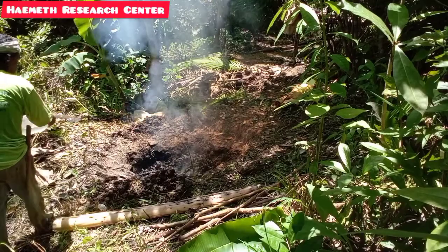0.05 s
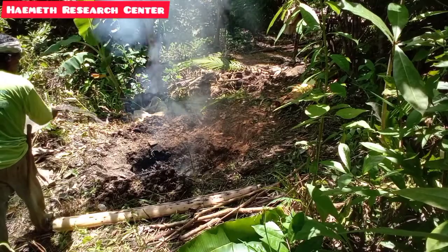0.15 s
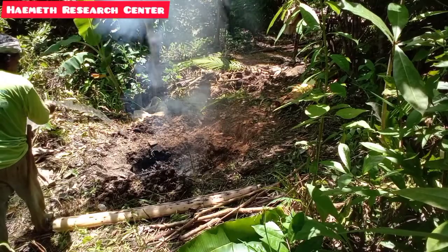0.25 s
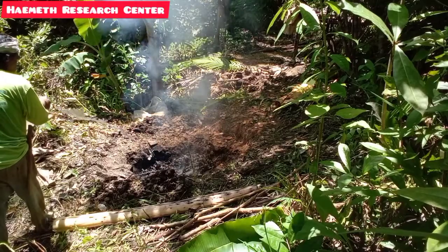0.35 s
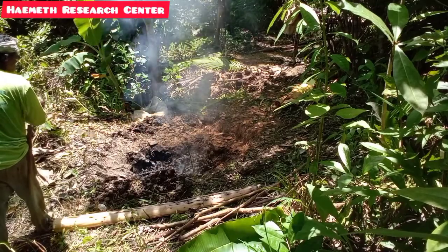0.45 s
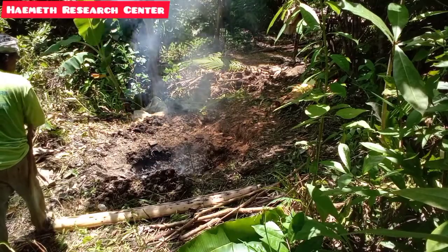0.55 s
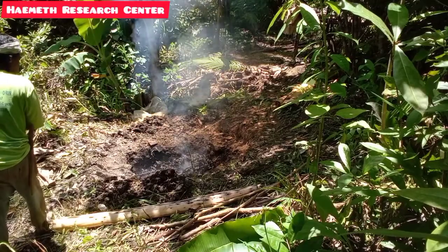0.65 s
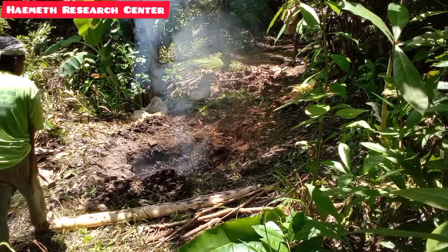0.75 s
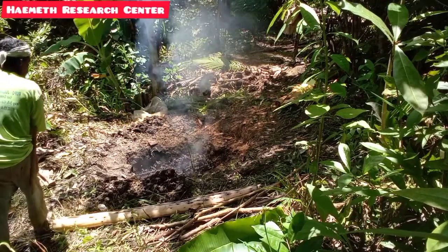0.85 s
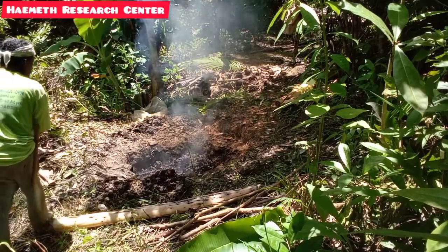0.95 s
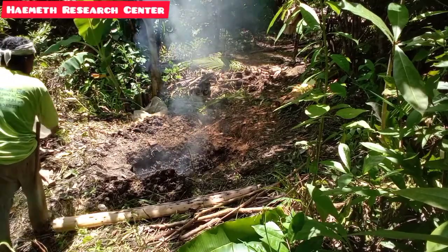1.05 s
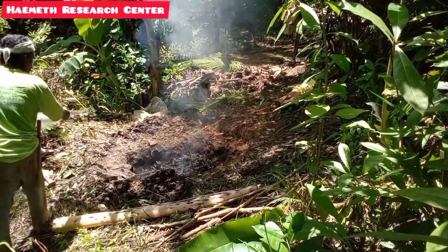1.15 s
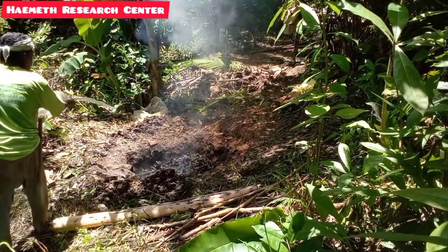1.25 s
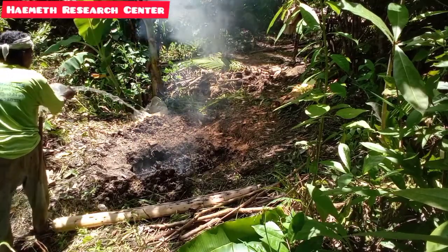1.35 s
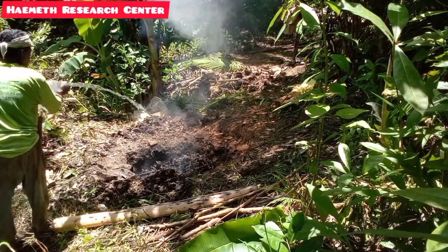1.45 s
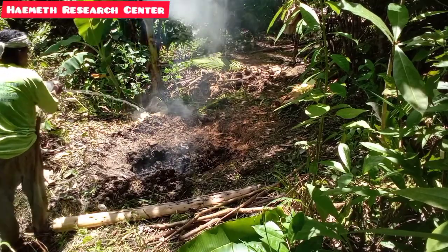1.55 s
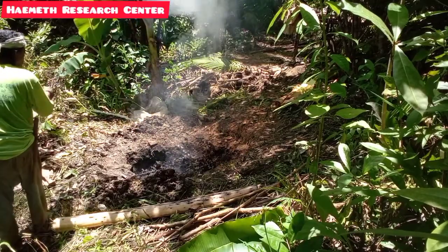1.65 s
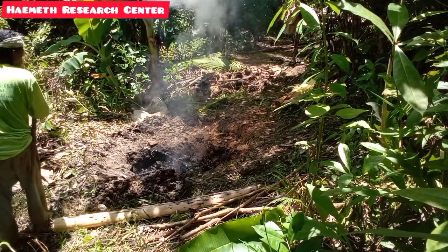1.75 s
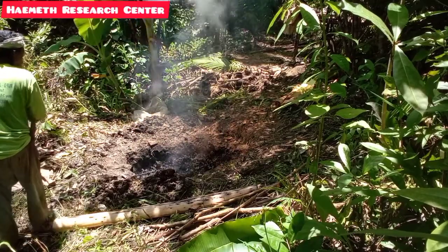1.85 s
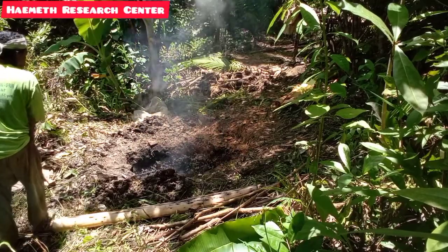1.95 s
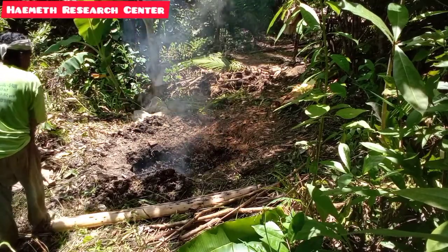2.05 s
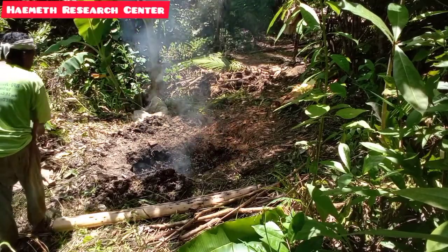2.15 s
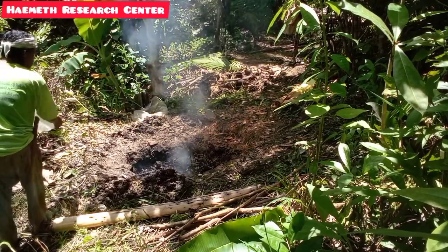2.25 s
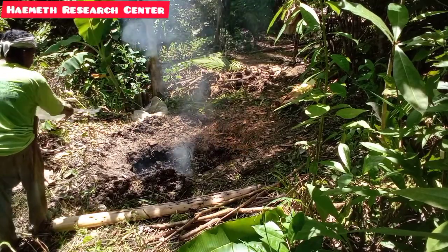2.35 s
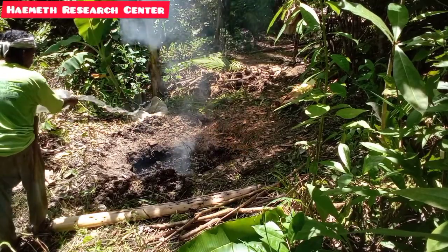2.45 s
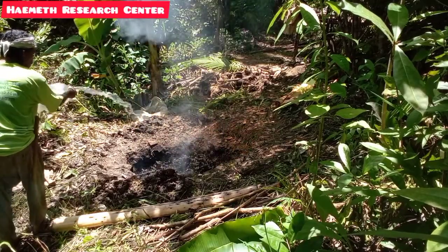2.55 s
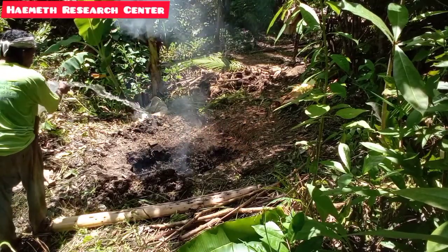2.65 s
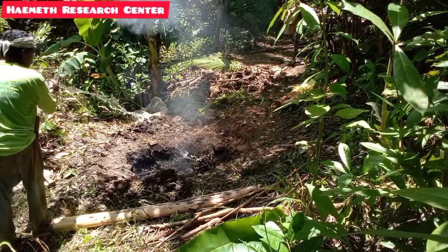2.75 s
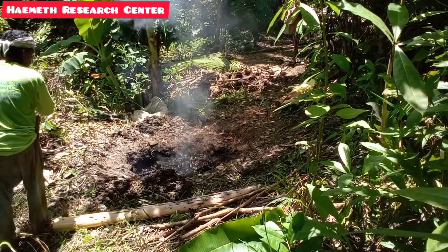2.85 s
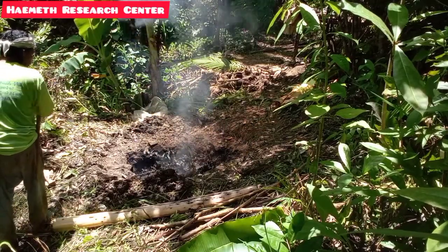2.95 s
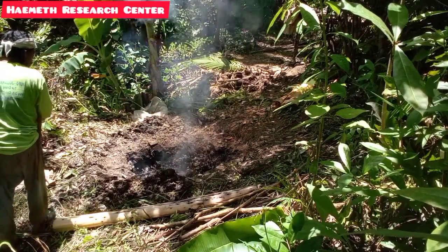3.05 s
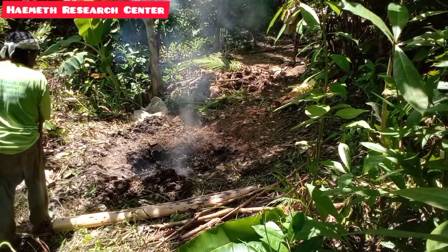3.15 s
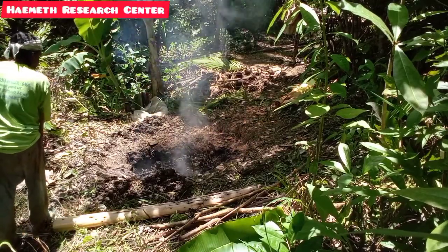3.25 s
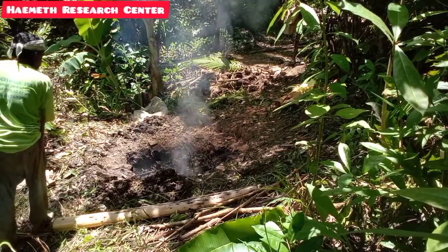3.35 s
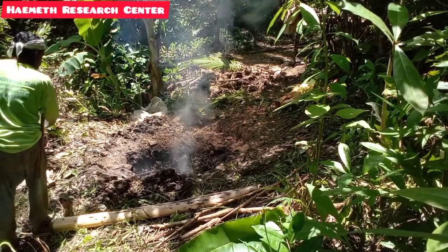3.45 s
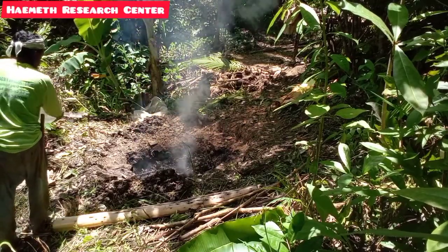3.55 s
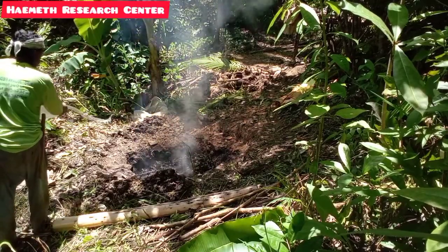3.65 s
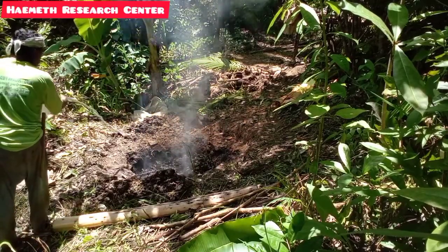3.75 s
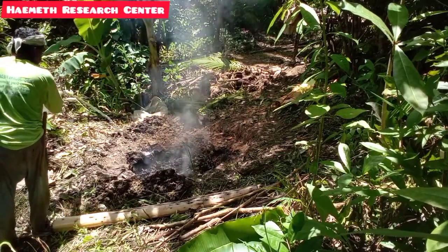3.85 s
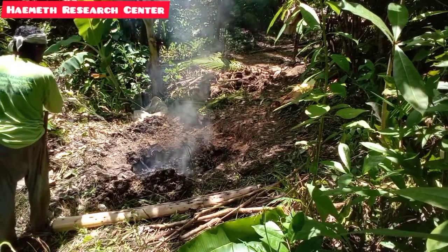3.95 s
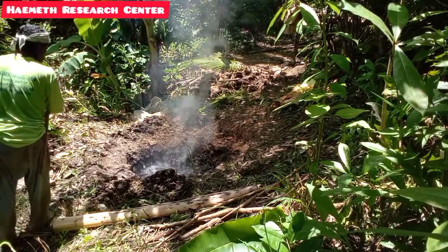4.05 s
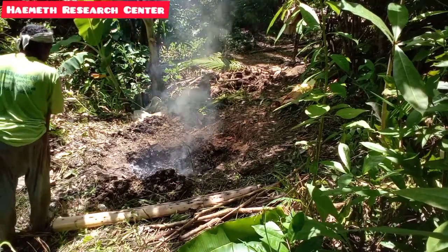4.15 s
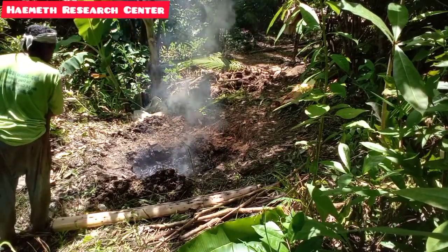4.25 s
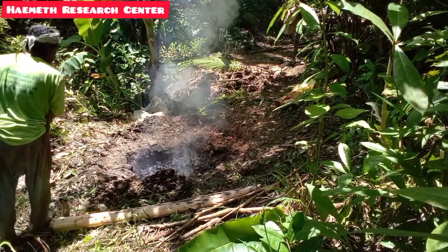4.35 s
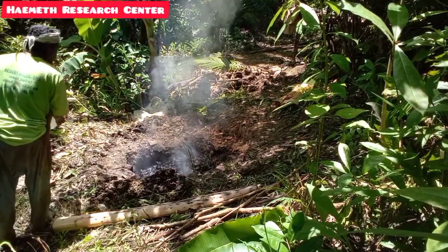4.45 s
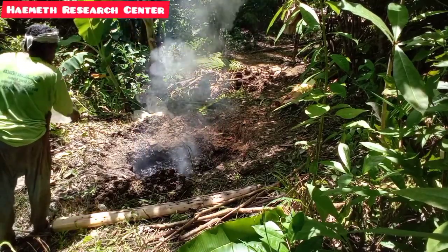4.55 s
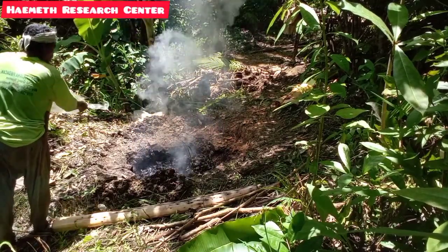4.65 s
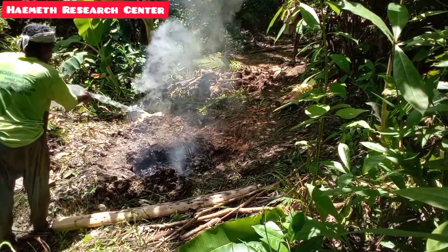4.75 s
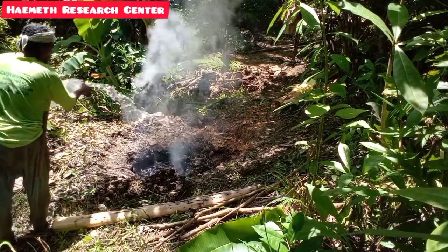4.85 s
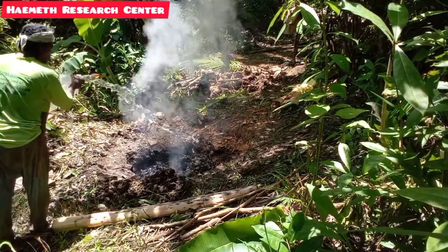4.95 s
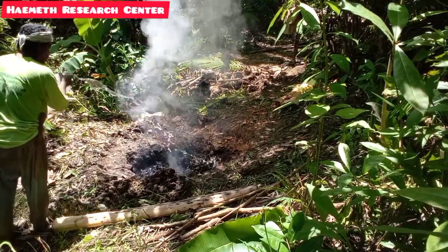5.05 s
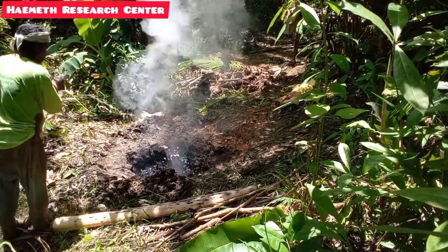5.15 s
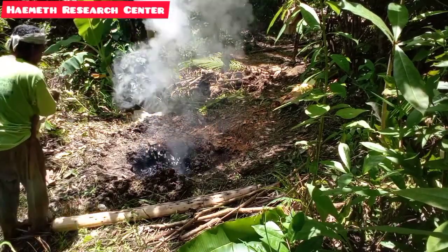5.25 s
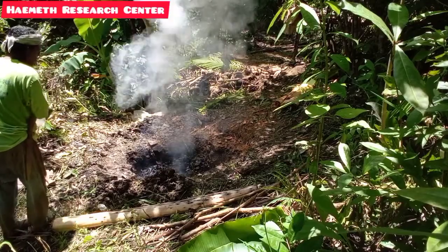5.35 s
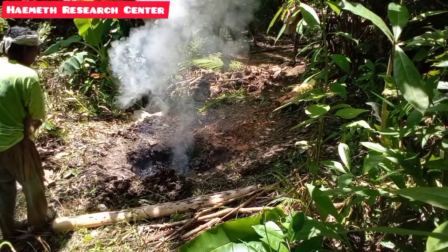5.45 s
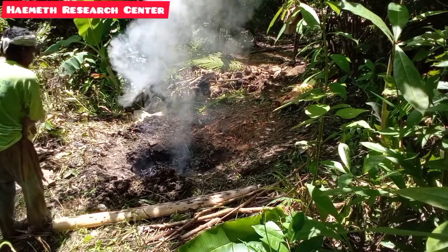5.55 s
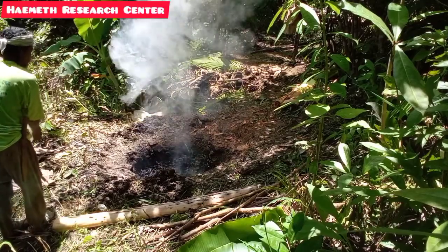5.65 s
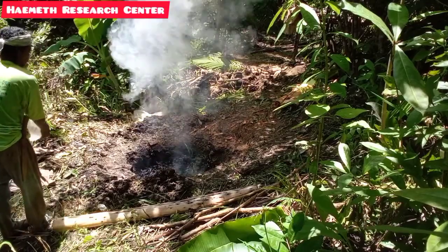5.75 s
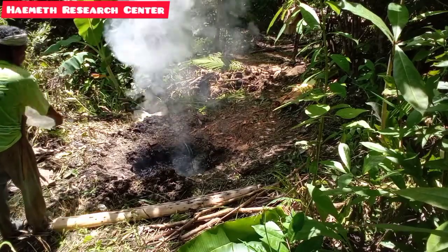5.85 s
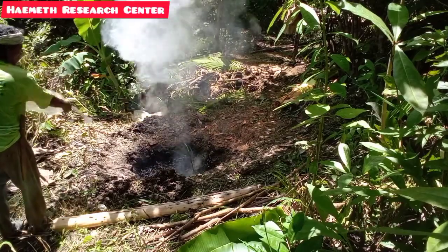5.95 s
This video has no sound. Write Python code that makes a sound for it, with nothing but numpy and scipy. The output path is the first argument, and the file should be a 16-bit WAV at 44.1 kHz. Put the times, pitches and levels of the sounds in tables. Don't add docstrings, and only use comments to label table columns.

```python
import sys
import numpy as np
from scipy import signal
from scipy.fft import rfft, irfft
from scipy.io import wavfile

SR = 44100
rng = np.random.default_rng(int(sys.argv[2]) if len(sys.argv) > 2 else 0)


def invert_db(x):
    u = np.asarray(x, float) / 20
    return 10 ** u


def generate_wav(sig):
    pcm = np.round(np.clip(np.atleast_2d(sig).T, -1, 1) * 32767).astype(np.int16)
    wavfile.write(sys.argv[1], SR, pcm)


N = 264600
LEAD = 1200


def rms_one(x):
    return x / np.sqrt(np.mean(x ** 2) + 1e-20)


def in_time(rows):
    s, *columns = np.transpose(rows)
    return [np.interp(np.arange(N) / SR, s, c) for c in columns]


def coloured(x, spectrum):
    hz, level_db = np.transpose(spectrum)
    grid_hz = np.fft.rfftfreq(N, 1 / SR) + 1
    gain_db = np.interp(np.log(grid_hz), np.log(hz), level_db, left=-80)
    return irfft(rfft(x) * invert_db(gain_db), N)


def band(x, low_hz, high_hz, order=2):
    return signal.sosfilt(signal.butter(order, [low_hz, high_hz], "band", fs=SR, output="sos"), x)


def drift(rate):
    r = np.exp(-80 * np.pi * rate / SR)
    coarse = rng.standard_normal(N // 40 + 2002)
    slow = signal.lfilter([1], [1, -2 * r, r * r], coarse)[2000:]
    return np.interp(np.arange(N) / 40, np.arange(len(slow)), rms_one(slow))


def grains(per_s, spread_db):
    sizes = invert_db(spread_db * np.minimum(rng.exponential(1, N), 5)) * rng.choice([-1, 1], N)
    return rms_one(sizes * (rng.random(N) < per_s / SR))


def swell(bed_db, *heaps, hold=1):
    ms = np.arange(N * 1000 // SR + 2)
    power = 1e-12
    for s, peak_db, rise_ms, fall_ms in heaps:
        late = ms[:, None] - 1000 * s
        loss = np.where(late < 0, -late / rise_ms, np.abs(late / fall_ms) ** hold)
        power = power + (invert_db(peak_db - 10 * loss) ** 2).sum(axis=1)
    return 10 * np.log10(invert_db(bed_db) ** 2 + np.interp(np.arange(N) * 1000 / SR, ms, power))


def tone(hz):
    return lambda s: np.cos(2 * np.pi * hz * s)


def burst(swell_ms, fade_ms, wave):
    s = np.arange(-LEAD, 3 * LEAD) / SR
    early = (s * 1000 / max(swell_ms, .1)) ** 4
    late = np.abs(s * 1000 / max(fade_ms, .3)) ** 2.5
    return invert_db(-8 * np.where(s < 0, early, late)) * wave(s)


def add(out, s, x, lead=0):
    at = round(s * SR) - lead
    out[at:at + len(x)] += x[:N - at]


def air_pockets(rows):
    out, wet = np.zeros(N), rms_one(band(rng.standard_normal(N), 780, 1260))
    for s, peak_db, hz, swell_ms, fade_ms, splash_db in rows:
        add(out, s, invert_db(peak_db - 2.54) * burst(swell_ms, fade_ms, tone(hz)), LEAD)
        splash = burst(0.87 * swell_ms, 3.2 * fade_ms,
                       lambda t: wet[np.round((s + t) * SR).astype(int) % N])
        add(out, s - 0.449 * swell_ms / 1000, invert_db(peak_db + splash_db - 9.0) * splash, LEAD)
    return out


def steam_pockets(rows):
    return air_pockets([(s, db, hz, half_ms, half_ms, -14) for s, db, hz, half_ms in rows])


def snaps(rows):
    out, noise = np.zeros(N), rng.standard_normal((len(rows), 4 * LEAD))
    wander = .07 * np.cumsum(noise[:, ::-1], axis=1)
    wander = wander - wander[:, LEAD:LEAD + 1]
    for (s, peak_db, hz, fade_ms), rough, turn in zip(rows, noise, wander):
        ring = burst(0.27, fade_ms, lambda t: np.cos(2 * np.pi * hz * t + turn) + 0.26 * rough)
        add(out, s, invert_db(peak_db) * ring, LEAD)
        add(out, s, invert_db(peak_db - 14.0) * burst(0.076, 0.17, tone(1.3 * hz)), LEAD)
    return band(out, 250, 5000, order=1)


def bubbles(per_s, ring_ms, spread_db):
    luck, out = rng.random((round(per_s * N / SR), 3)), np.zeros(N + 1000)
    s = np.arange(700) / SR
    hz = 500 + 11000 * luck[:, 1:2] ** 2
    sizes = invert_db(-spread_db * np.log(luck[:, 2:] + .01)) * (hz / 1000) ** .25
    fade = invert_db(-40 * s * 1000 / ring_ms) * (1 - np.exp(-s * 1500))
    rings = sizes * np.sin(2 * np.pi * hz * s) * fade
    np.add.at(out, (luck[:, :1] * N).astype(int) + np.arange(len(s)), rings)
    return rms_one(out[:N])


# time_s, simmer_db, draught_db
PIT_STATE = [(0, -38.5, -51.5), (.25, -46.5, -52), (.47, -48.5, -47), (.8, -45.5, -52), (1.1, -48, -55.5),
             (1.25, -43.5, -48), (1.66, -46, -43.5), (2.05, -43.5, -44), (2.3, -44.5, -50.5),
             (2.75, -48.5, -47), (3.25, -42.5, -52), (3.5, -47, -49.5), (3.94, -47, -50),
             (4.26, -42.5, -52), (4.9, -43, -53.5), (5.45, -43.5, -46.5), (5.7, -49.5, -56.5),
             (6, -49.5, -56.5)]
# crest_s, fall_ms (per 10 dB), boiling_db, deep_surge_db, hollow_pit_db
GUSHES = [(0.407, 17, -62, -31, -61), (.518, 84, -40, -33, -37.5), (0.624, 84, -38.5, -37, -37),
          (.675, 81, -39, -48, -36), (1.688, 100, -35.5, -27.5, -28), (1.73, 60, -36.5, -31, -27),
          (1.778, 68, -32, -41, -29), (1.829, 86, -35.5, -28, -35.5), (1.9, 60, -38, -33, -42),
          (1.932, 71, -32.5, -23, -44), (1.988, 15, -33.5, -32, -23.5), (2.854, 40, -31, -25, -24.5),
          (2.871, 60, -22.5, -21.5, -28), (2.904, 24, -26, -30, -23), (3.002, 84, -34.5, -27.5, -39),
          (3.119, 73, -30.5, -28.5, -29), (3.075, 106, -39, -34, -33.5), (3.982, 192, -39.5, -36, -30),
          (4.2, 257, -44.5, -41, -42), (5.098, 80, -55, -38, -37), (5.179, 54, -31, -27.5, -31.5),
          (5.271, 39, -37.5, -34, -36), (5.35, 80, -51, -35.5, -36.5), (5.43, 88, -64, -30.5, -37.5)]
SPRAY_DB, SPRAY_FOLLOWS = -51, 0.7
SPRAY_GUSH_DB, SPRAY_GUSH_FOLLOWS, SPRAY_FALL_SHARE = -45, 0.59, 2.66
MIST_DB, MIST_FALL_MS = -10, 510
SPLATTER_DB, SPLATTER_DRAUGHT, SPLATTER_GUSH_DB = -4.5, 0.63, -3
GUSH_RISE_MS, WEAK_GUSH_SLOWER = 6, .7
BOIL_HOLD = 1.01
SLOSH_RISE_MS, SLOSH_FALL_MS = 2, 79
SLOSH_SPLATTER_DB, SLOSH_HOLLOW_DB = -15.5, -20


def boiling():
    simmer_db, draught_db = in_time(PIT_STATE)
    s, fall_ms, boil_db = np.transpose(GUSHES)[:3]
    dip_s, slap_db = np.transpose(DIPS)[:2]
    rise_ms = GUSH_RISE_MS * invert_db(-WEAK_GUSH_SLOWER * np.minimum(boil_db + 32, 0))
    over_db, wind_db = simmer_db + 46, draught_db + 50
    fine_db = SPRAY_GUSH_DB + SPRAY_GUSH_FOLLOWS * (boil_db + 36.5)
    spray = swell(SPRAY_DB + SPRAY_FOLLOWS * over_db,
                  (s, fine_db, rise_ms, SPRAY_FALL_SHARE * fall_ms),
                  (s, fine_db + MIST_DB, rise_ms, MIST_FALL_MS))
    splatter = swell(simmer_db + SPLATTER_DB + SPLATTER_DRAUGHT * (wind_db - over_db),
                     (s, boil_db + SPLATTER_GUSH_DB, rise_ms, fall_ms),
                     (dip_s, slap_db + SLOSH_SPLATTER_DB, SLOSH_RISE_MS, SLOSH_FALL_MS), hold=BOIL_HOLD)
    boil = swell(simmer_db, (s, boil_db, rise_ms, fall_ms), hold=BOIL_HOLD)
    return splatter, boil, spray


# frequency_hz, level_db (per Hz)
FIZZ = [(600, -6.5), (1050, -4.5), (1450, -1.5), (1950, -4), (2450, 3), (3300, 0.5), (4200, -2),
        (5000, -11.5), (6300, -17.5), (7500, -12.5), (8300, -5.5), (9300, -13.5), (11500, -21),
        (15700, -16)]


def sizzle():
    splatter_db, boil_db, spray_db = boiling()
    pops = [coloured(grains(15000, 1.3) + .42 * bubbles(900, 22.0, 1.4), FIZZ) for _ in range(2)]
    together, out = drift(21), np.zeros(N)
    groups = [(splatter_db, 640, 1900), (boil_db, 1900, 5000), (spray_db, 5000, 16000)]
    for group_db, low_hz, high_hz in groups:
        edges = np.geomspace(low_hz, high_hz, 5)
        part = np.zeros(N)
        for k in range(4):
            flicker = invert_db(.45 * together + .6 * drift(5.4))
            part += flicker * band(pops[k % 2], edges[k], edges[k + 1])
        out += invert_db(group_db - 1.04) * rms_one(part)
    return out


# frequency_hz, level_db (per Hz)
PIT = [(15, -55), (25, -45), (42, -26), (63, -1), (85, 5), (125, -1.5), (178, -7), (259, -6.5), (419, -7),
       (574, -9), (719, -17), (900, -64), (1170, -59), (1980, -120)]
DEEP_DB, DEEP_FOLLOWS, DEEP_LUMPS_DB = -61, 0.73, 2
SURGE_RISE_MS, SURGE_FALL_SHARE = 12, 1.02
SURGE_LAG_MS, SURGE_HOLD = 4.6, 1.37


def surge():
    draught_db = in_time(PIT_STATE)[1]
    s, fall_ms, _, push_db, boom_db = np.transpose(GUSHES)
    s = s + SURGE_LAG_MS / 1000
    fall_ms = SURGE_FALL_SHARE * fall_ms
    dip_s, plop_db = np.transpose(DIPS)[[0, 3]]
    lumps_db = DEEP_FOLLOWS * (draught_db + 52) + DEEP_LUMPS_DB * drift(1.5)
    deep_db = swell(DEEP_DB + lumps_db, (s, push_db, SURGE_RISE_MS, fall_ms), hold=SURGE_HOLD)
    hollow_db = swell(draught_db, (s, boom_db, SURGE_RISE_MS, fall_ms),
                      (dip_s, plop_db + SLOSH_HOLLOW_DB, SLOSH_RISE_MS, SLOSH_FALL_MS), hold=SURGE_HOLD)
    shoves = [coloured(grains(900, 2.25), PIT) for _ in range(2)]
    deep = rms_one(band(shoves[0], 26, 170) * invert_db(1.8 * drift(3.8)))
    hollow = rms_one(band(shoves[1], 172, 620) * invert_db(0.41 * drift(33.8)))
    return invert_db(deep_db - 2.0) * deep + invert_db(hollow_db - 3.0) * hollow


# slap_s, slap_db, plop_delay_ms, plop_db, plop_hz
DIPS = [
    (0.0866, -26, 2, -21, 387),
    (1.2197, -29, 10.6, -17, 430),
    (2.4799, -28, 2.8, -22, 403),
    (3.6178, -32, 2.6, -23, 460),
    (4.7595, -25, 3.4, -21, 400),
    (5.937, -25, 0.2, -30, 465),
]
SLAP_HZ, SLAP_FADE_MS = 960, 2.6
PLOP_SWELL_MS, PLOP_FADE_MS, PLOP_SPLASH_DB = 3.2, 3.5, -8
REBOUND_MS, REBOUND_DB, REBOUND_LENGTH_MS, REBOUND_SPLASH_DB = 9.43, -11, 3, -7


def dips():
    slaps, plops = [], []
    for slap_s, slap_db, delay_ms, plop_db, hz in DIPS:
        slaps.append((slap_s, slap_db, SLAP_HZ, SLAP_FADE_MS))
        s = slap_s + delay_ms / 1000
        plops.append((s, plop_db, hz, PLOP_SWELL_MS, PLOP_FADE_MS, PLOP_SPLASH_DB))
        plops.append((s + REBOUND_MS / 1000, plop_db + REBOUND_DB, hz,
                      REBOUND_LENGTH_MS, REBOUND_LENGTH_MS, REBOUND_SPLASH_DB))
    return snaps(slaps) + air_pockets(plops)


# crest_s, peak_db, pitch_hz, half_length_ms
MORE_PUFFS = [(1.256, -39, 440, 2.1), (1.2666, -34, 380, 2.6), (2.8184, -30, 497, 2.3), (2.837, -31, 300, 5.3),
              (4.31, -33.5, 230, 5.3), (4.385, -37, 220, 6), (2.7957, -27, 407, 1.1), (.185, -38.5, 184, 6),
              (0.5211, -27, 280, 4), (0.6345, -35, 353, 2.8), (0.743, -32, 206, 9), (0.862, -40, 233, 9),
              (3.2084, -25.5, 240, 3.6), (4.01, -29, 392, 8), (4.126, -30, 268, 4.6), (4.04, -28, 300, 8),
              (4.075, -29, 290, 6), (4.108, -30, 200, 5), (5.075, -38, 350, 8), (4.147, -38, 272, 3),
              (4.245, -28, 257, 2.5), (5.107, -26.5, 314, 4.9), (5.199, -24, 341, 0.86),
              (5.337, -28.5, 278, 4.3), (5.462, -35, 257, 3.7), (5.527, -32.5, 257, 4.4)]


def more_puffs():
    return steam_pockets(MORE_PUFFS)


# crest_s,
# peak_db, pitch_hz, fade_ms
MORE_SNAPS = [(.511, -36, 1260, 2.8), (1.2202, -31.5, 3270, 2.9), (1.937, -25, 1700, 1.5),
              (2.424, -33, 1370, 1.3), (2.831, -36, 2840, 2.8), (3.004, -34, 2000, 2), (3.117, -30, 1550, 3),
              (3.15, -28, 2500, 3), (3.086, -32, 1200, 2), (3.055, -35, 3000, 4), (.529, -33, 1500, 2),
              (.586, -35, 1400, 3), (.734, -36, 3500, 3), (.738, -36, 4800, 3), (.697, -33, 2500, 2),
              (.737, -36, 1450, 5), (4.003, -34, 860, 4), (3.0041, -27, 5270, 0.98), (3.1248, -28, 2480, 1.5),
              (4.69, -40.5, 905, 6.6), (4.703, -38, 1180, 5.8), (5.19, -37, 4200, 1.6),
              (5.634, -38.5, 1350, 3.8)]


def more_snaps():
    return snaps(MORE_SNAPS)


# crest_s, peak_db, pitch_hz, half_length_ms
PUFFS = [(.528, -27.5, 422, 4.2), (0.6696, -30, 432, 1.9), (0.6791, -22, 372, 1.4), (1.687, -20, 240, 2.8),
         (1.694, -17, 292, 0.8), (1.7523, -11, 359, 1.4), (1.7744, -10.5, 243, 3.7),
         (1.7939, -12.5, 284, 1.6), (1.8322, -19.5, 305, 1.8), (1.9028, -17.5, 290, 3.5),
         (1.9305, -17, 318, 2.6), (1.9368, -4, 396, 1.2), (1.9723, -24, 302, 3.5), (1.9988, -24, 400, 2.3),
         (2.012, -27, 200, 5), (1.886, -22, 250, 3), (1.708, -22, 330, 3), (2.7888, -28.5, 455, 1.9),
         (2.8688, -9, 360, 1.2), (2.8822, -9, 336, 1.6), (2.8912, -8, 260, 2), (2.9048, -8, 347, 2.7),
         (2.9152, -13, 353, 2), (2.9783, -22.5, 210, 4.1), (3.096, -24.5, 284, 6.6), (3.119, -14, 400, 2),
         (3.128, -21, 200, 4), (3.094, -18, 160, 5), (2.8945, -15, 190, 5), (2.921, -20, 190, 5),
         (1.737, -25, 200, 5), (3.123, -22, 560, 5), (3.15, -24, 540, 4), (5.272, -29, 540, 5),
         (5.19, -25, 540, 5), (3.636, -33, 430, 2.5), (2.495, -31, 400, 3), (2.905, -14, 190, 6),
         (3.1507, -18, 374, 1.1), (3.997, -21, 294, 2.9), (4.2267, -32, 302, 2.9),
         (5.1807, -14.5, 329, 7.7), (5.2685, -26, 386, 2), (5.2175, -24, 250, 2), (5.228, -27, 300, 2),
         (5.298, -29, 250, 4), (5.357, -24, 306, 3.2), (5.4387, -29, 290, 2.6)]


def puffs():
    return steam_pockets(PUFFS)


# crest_s, peak_db, pitch_hz, half_length_ms
THUMPS = [(0.531, -40, 86.0, 11), (0.5546, -21, 97.0, 5.5), (0.6718, -22, 81, 14), (1.7676, -14, 118, 3.3),
          (1.8387, -9.5, 101, 5.6), (2.8875, -21, 118, 7.4), (2.9116, -8.5, 86, 5), (3.036, -20, 93.0, 4),
          (3.105, -13, 85, 14), (4.05, -22, 95, 12), (3.731, -37, 77, 19), (4.37, -30, 90, 13),
          (2.8, -33, 75, 14), (5.151, -24, 110, 10), (5.401, -22, 100, 11), (1.6, -39, 80, 20),
          (4.016, -28, 89.0, 4.5), (5.112, -20, 112, 6.8), (5.2162, -24, 105, 13), (5.364, -17, 90, 8),
          (5.451, -20, 86, 14)]


def thumps():
    out = np.zeros(N)
    for s, peak_db, hz, half_ms in THUMPS:
        add(out, s, invert_db(peak_db - 8.0) * burst(half_ms, half_ms, tone(hz)), LEAD)
    return out


# crest_s,
# peak_db, pitch_hz, fade_ms
CRACKS = [(1.94, -16.5, 546, 3.1), (2.787, -34, 600, 1.4), (5.177, -21, 530, 3.6), (0.738, -35, 2400, 2.5),
          (1.2197, -28, 2400, 1.5), (1.794, -13, 1410, 1.3), (1.806, -27, 2570, 2.2),
          (1.866, -25, 2650, 1.9), (1.908, -27, 1350, 2.5), (1.888, -29, 1600, 4), (1.826, -26, 1450, 5),
          (1.808, -28, 1500, 3), (1.712, -29, 2700, 4), (1.693, -31, 2550, 4), (1.697, -31, 1500, 5),
          (1.776, -30, 1600, 3), (1.953, -30, 2300, 3), (2.448, -32.5, 2300, 1.7), (2.8545, -27, 2570, 1.2),
          (2.866, -23, 3000, 2), (2.8817, -6, 2700, 0.9), (2.8748, -17, 2700, 2.5), (2.876, -20, 1450, 1.5),
          (2.8774, -22, 4000, 2), (2.8545, -31, 1500, 2), (2.8945, -18, 3000, 1.5), (2.9092, -17, 3000, 2),
          (2.9148, -17, 1200, 1.5), (2.887, -16, 2700, 1.5), (2.8908, -11, 1430, 1.5),
          (2.9042, -14, 1400, 2), (2.909, -13.5, 1640, 2), (2.9119, -17.5, 1240, 4.1),
          (3.0039, -26, 3960, 2), (3.119, -25.5, 2300, 2.4), (3.1482, -31.5, 1770, 12),
          (3.985, -33, 1180, 4.3), (3.992, -30, 1295, 1.4), (5.047, -30.5, 836, 2.7),
          (5.1715, -24, 1850, 2), (5.184, -20, 2760, 1.8), (5.267, -29, 1250, 2), (5.1835, -25, 1250, 2.5),
          (5.197, -24, 2000, 2), (5.207, -27, 2600, 3), (5.277, -33, 3200, 4), (5.288, -32, 3100, 3),
          (5.355, -31, 1500, 3), (5.34, -33, 1400, 2), (5.48, -27, 2490, 1.2), (5.938, -33, 2100, 3),
          (5.946, -34, 2100, 3), (5.9428, -28, 1250, 1.5), (1.2245, -30, 950, 1.5)]


def cracks():
    return snaps(CRACKS)


# delay_s, level_db
ECHOES = [
    (0.01, -19.5),
    (0.026, -13.5),
    (0.059, -20.5),
]


def echoes(x):
    out, dull = x.copy(), band(x, 73, 3400, order=1)
    for s, level_db in ECHOES:
        add(out, s, invert_db(level_db) * dull)
    return out


# start_s, end_s, pulse_rate_hz, level_db, third_partial_stress_db (on every third partial)
BUZZ = [
    (2.03, 2.4, 55.2, -52.5, 10),
    (3.2, 3.56, 48.5, -53, 3),
]
# frequency_hz, level_db
BUZZ_COLOUR = [(350, -12), (450, -4), (650, -7), (850, 0), (1010, -1), (1150, -14)]


def buzz():
    out, (colour_hz, colour_db) = np.zeros(N), np.transpose(BUZZ_COLOUR)
    for start, end, per_s, level_db, stress_db in BUZZ:
        s = np.arange(round((end - start) * SR)) / SR
        orders = np.arange(6, 25)[:, None]
        gains = invert_db(np.interp(orders * per_s, colour_hz, colour_db) + stress_db * (orders % 3 == 0))
        comb = gains * np.sin(2 * np.pi * (orders * per_s * s + rng.random(orders.shape)))
        fade = signal.windows.tukey(len(s), .5)
        add(out, start, invert_db(level_db) * rms_one(comb.sum(axis=0)) * fade)
    return out * invert_db(2 * drift(16))


def scene():
    hits = dips() + more_puffs() + more_snaps() + puffs() + thumps() + cracks()
    return (sizzle() + surge() + echoes(hits) + buzz())[None]


def band_limit(x):
    return signal.sosfilt(signal.butter(12, 15850, fs=SR, output="sos"), x)


def record(dry):
    thin = signal.sosfilt(signal.butter(2, 40, "high", fs=SR, output="sos"), dry)
    mix = signal.sosfilt(signal.ellip(10, .5, 70, 15500, fs=SR, output="sos"), thin)
    return band_limit(mix)


dry = scene()
out = record(dry)
generate_wav(out)
```